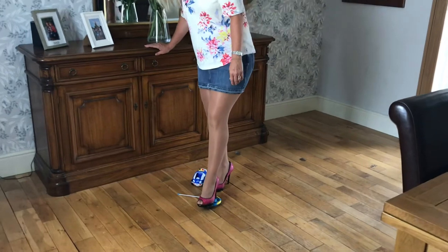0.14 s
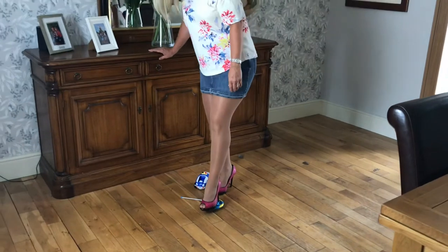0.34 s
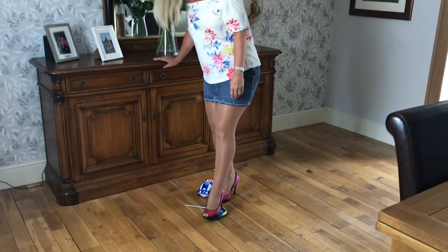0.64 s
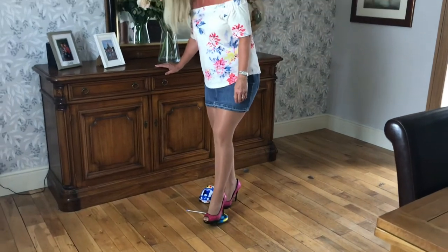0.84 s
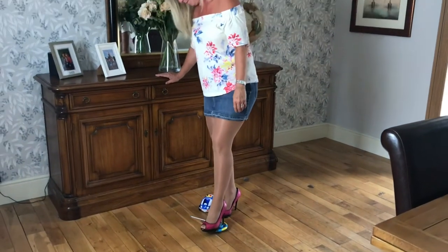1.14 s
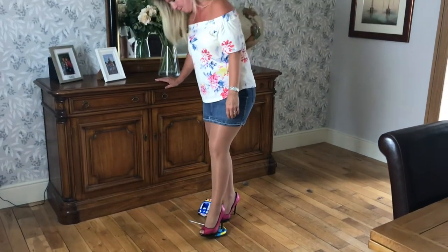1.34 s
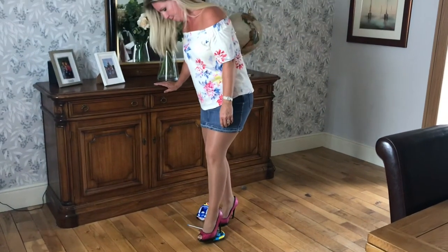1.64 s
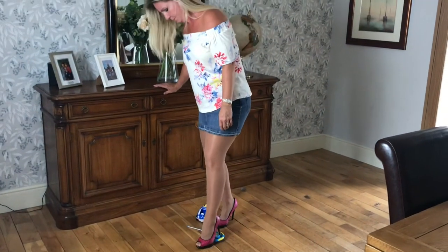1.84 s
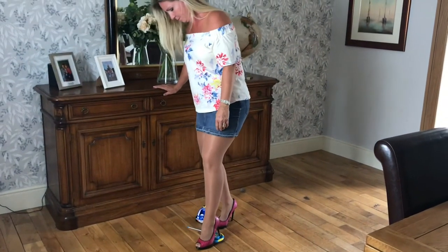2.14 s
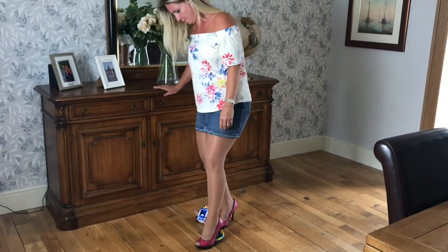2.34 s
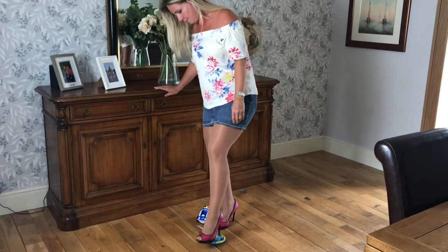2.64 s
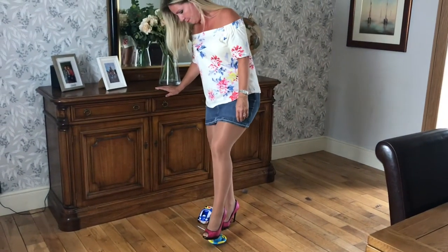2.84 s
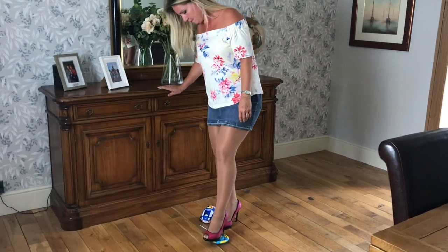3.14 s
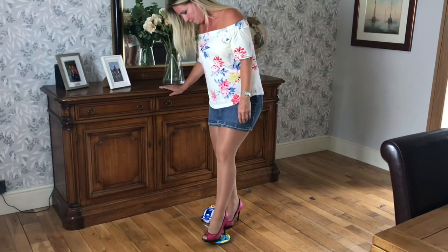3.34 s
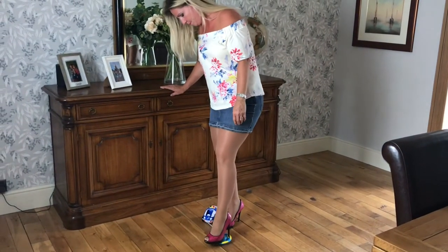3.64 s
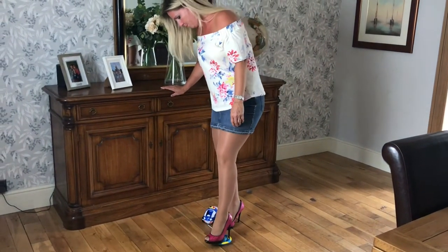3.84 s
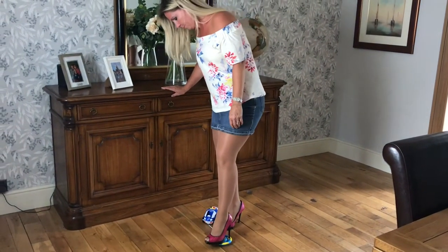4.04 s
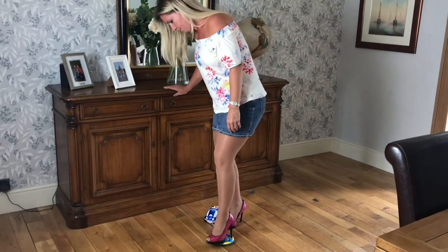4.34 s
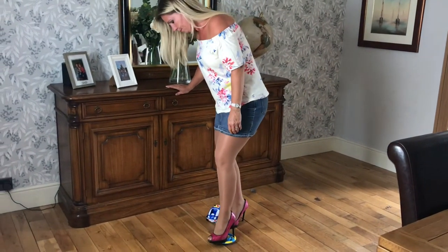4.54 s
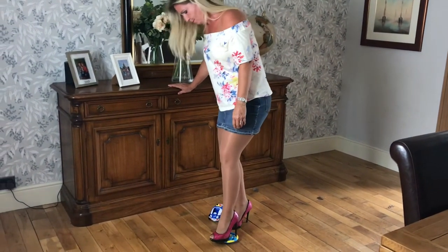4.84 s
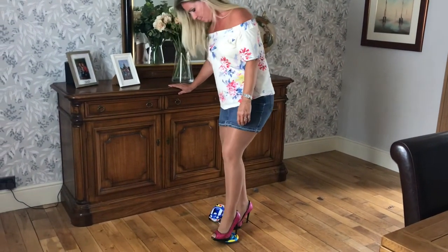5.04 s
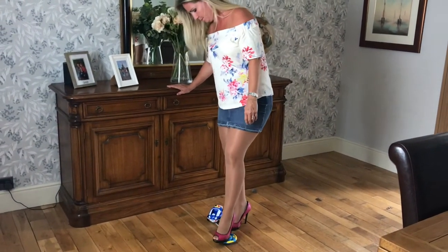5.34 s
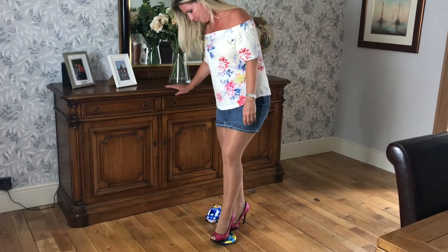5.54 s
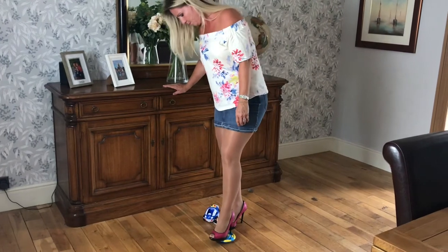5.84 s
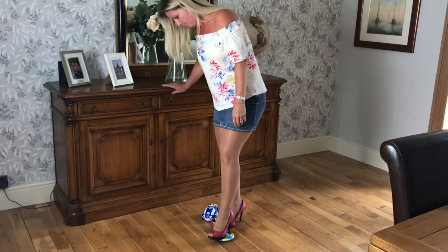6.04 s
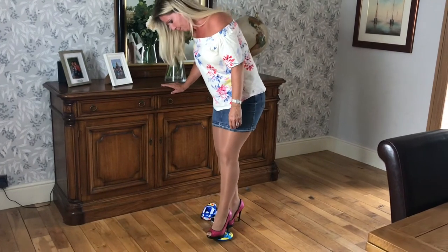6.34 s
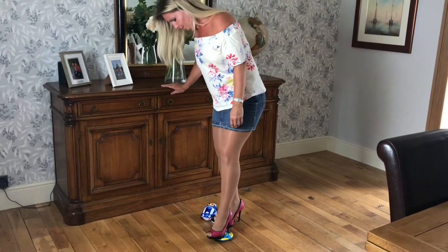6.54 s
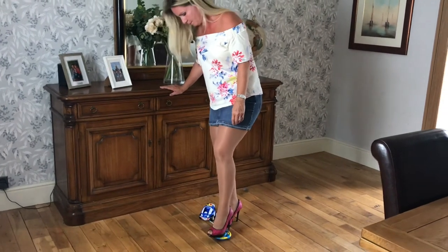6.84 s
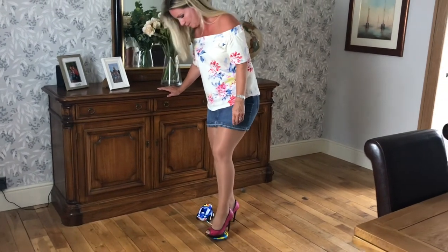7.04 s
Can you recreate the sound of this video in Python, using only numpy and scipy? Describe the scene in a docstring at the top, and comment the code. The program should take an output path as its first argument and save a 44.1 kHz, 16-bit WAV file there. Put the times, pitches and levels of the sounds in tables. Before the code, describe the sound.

A heel works on a hard, hollow plastic toy on a wooden floor in a bare, reflective room, heard in mono from a few metres. Barely audible ticks open it, then clear clacks at about 0.4, 0.55 and 0.85 s. After a softer knock at 1.3 s, the brightest, hardest cracks snap at 1.65 and 1.7 s, with a duller one at 1.8 s. From 2.2 to 2.5 s a tight flurry of loud, hollow crunching knocks tumbles together. Lighter knocks come near 3.2, 3.35 and 3.5 s, then sparse faint clicks from 4.1 to 5 s. Modest clacks follow at 5.3 and 5.8 s, a strong hollow knock at 6.47 s and a duller one at 6.74 s. Each leaves about half a second of reverberation. Soft room noise and low rumble swell at the end, with a faint low drone.

```python
"""Hard toy ground under a heel in a bare room

A heel grinds and stamps a hard plastic toy on a wooden floor, heard from a few metres. Each contact is a noise
burst through the resonances of boards, hollow, shell and cracking plastic. The room adds three echoes and a
diffuse tail, longest near 1 kHz and shortest at the top, as noise under a decaying envelope.
Below lie filtered noises: a low rumble, faint room noise and a late drone."""
import sys
import numpy as np
from scipy import signal
from scipy.fft import rfft, irfft
from scipy.io import wavfile

SR = 44100
rng = np.random.default_rng(int(sys.argv[2]) if len(sys.argv) > 2 else 0)


def materialize(psi):
    """Save the field psi as 16-bit PCM at rate SR to the path in sys.argv[1].

    A 1-D psi becomes a single channel; in a 2-D psi each row is a channel.
    """
    bounded = np.clip(np.atleast_2d(psi).T, -1, 1)
    quanta = np.round(bounded * 32767).astype(np.int16)
    wavfile.write(sys.argv[1], SR, quanta)


N = 316197

# contacts: t/s, push on floor/dB, knock on hollow/dB, crack/dB, crack treble slope/(dB/octave),
# favoured f of squashed hollow/Hz, favoured f of bent shell/Hz, hollow ring re its drive/dB, burst length/ms
CONTACTS = [(0.0353, -74.5, -53.5, -60.5, -16, 1064, 2920, -4, 1.2),
            (0.2087, -76, -51.5, -83, 12.5, 915, 1770, -16, 2.3),
            (0.3794, -34.5, -27, -30, -1, 730, 5200, -13, 0.47),
            (0.5462, -46, -34, -22.5, 3.5, 775, 2540, -3.5, 0.63),
            (0.856, -42.5, -35.5, -29.5, -10, 730, 2630, -6, 1.2),
            (1.337, -53, -47, -54.5, -17, 753, 2470, -11, 2.1),
            (1.423, -72, -67.5, -60.5, -2.5, 602, 4400, -4, 2.5),
            (1.6207, -63, -55.5, -64, -3, 640, 4050, -14.5, 2.5),
            (1.6443, -26.5, -24, -13.5, -7, 597, 5000, -4.5, 0.18),
            (1.7103, -24.5, -22.5, -15, -4, 720, 2496, -9, 0.45),
            (1.799, -38.5, -29, -26, -6.5, 663, 2820, -3, 6.8),
            (1.9992, -65, -43.5, -34.5, -11, 650, 4320, -11, 0.33),
            (2.1713, -63, -46, -48, -4, 594, 2300, -10, 1.4),
            (2.199, -28, -29.5, -41, -8, 1020, 2220, -7, 4.7),
            (2.2073, -28.5, -17.5, -21.5, -5.5, 606, 2180, -3.5, 7.2),
            (2.2204, -34, -21.5, -24.5, -5, 730, 2400, -5, 4.4),
            (2.244, -24.5, -29, -38, -2, 710, 2180, -2, 5.1),
            (2.281, -28, -28.5, -47, -6, 684, 2220, -5, 5.1),
            (2.3519, -33, -26.5, -24, -2.5, 1146, 1760, -8.5, 1.2),
            (2.468, -43, -33, -38, -9, 728, 2250, -2, 29),
            (2.609, -62, -58, -49.5, -2.5, 696, 4370, -4, 3.2),
            (2.7982, -59.5, -63, -58.5, -7.5, 770, 3490, -4.5, 2.3),
            (3.184, -50.5, -46, -57.5, -22, 613, 2710, -6, 1.7),
            (3.2, -58.5, -44, -48, -6, 704, 2370, -14, 4.8),
            (3.3501, -35, -33, -44, -8, 660, 2430, -5, 2.3), (3.381, -46, -47, -58, 1, 723, 3050, 6, 2.6),
            (3.5116, -40, -33, -30, -10, 1255, 2950, -6.5, 0.35),
            (4.0905, -53, -45, -44.5, -8.5, 766, 2010, -4.5, 1.9),
            (4.203, -61, -57, -40.5, -3, 704, 8740, 2, 1.2),
            (4.4899, -57.5, -53, -61.5, -2, 540, 3820, -8.5, 1.1),
            (4.597, -63.5, -54.5, -54, -18, 1300, 2570, -15.5, 0.6),
            (4.692, -59, -57.5, -61, -2, 964, 3770, -10.5, 6),
            (4.77, -55, -56.5, -71, -3.5, 561, 2550, -13, 3.2),
            (4.8524, -70, -64.5, -55.5, -7.5, 1250, 5230, 1, 0.45),
            (4.9024, -64, -41, -43, -8, 1106, 2610, -12, 0.82),
            (4.9665, -55, -38.5, -53.5, -4, 920, 1940, -6.5, 2),
            (5.056, -60.5, -64, -75, -24, 973, 2130, -9, 3.3),
            (5.297, -74, -38.5, -60.5, -7, 932, 2600, -5, 5),
            (5.316, -43.5, -34, -41.5, -3, 1180, 6740, 0, 1.8),
            (5.4988, -75, -43, -54, -9, 806, 3980, -4, 3.5),
            (5.6523, -50.5, -46, -63.5, -1.5, 513, 3680, -13, 0.68),
            (5.7805, -74, -44, -56.5, -2.5, 970, 2080, 2, 2.8),
            (5.8054, -41.5, -31.5, -51, -12.5, 471, 3310, -12, 1.6),
            (5.9156, -58, -52, -57.5, 1.5, 1300, 1810, -1, 0.25),
            (6.379, -59.5, -67, -75, 2, 910, 3270, -1, 2.7),
            (6.4703, -44, -20, -25, -8.5, 968, 1890, -6, 1.7),
            (6.7365, -37, -31, -48, -12.5, 505, 1750, -14.5, 1.0),
            (7.0646, -56.5, -49.5, -61.5, -5.5, 906, 2590, -5, 2.2)]

# resonances of each part: f/Hz, width/Hz, relative level/dB
THUD = [(77.4, 76, -8), (115, 120, -4), (172, 31, -0.5)]
BOARDS = [(225, 47, -5), (355, 98, 1), (456, 180, -4.5)]
HOLLOW = [(535, 130, -1.5), (630, 98, -3), (710, 120, 1.5), (934, 340, -5), (1063, 160, -2),
          (1308, 260, -3.5)]
SHELL = [(1674, 180, -5), (1935, 210, -2), (2253, 280, -2.5), (2773, 690, -2)]
CRACK = [(3450, 470, -1.5), (3680, 460, -1), (4350, 810, 0)]
SNAP = [(5460, 810, -1), (6400, 2400, 0.62), (6930, 700, -2)]
SPLINTER = [(7980, 710, -4), (9150, 1200, 0)]
FIZZ = [(10900, 1300, -1.5), (12650, 1000, -1.2), (16000, 2000, -1.5)]
PARTS = [THUD, BOARDS, HOLLOW, SHELL, CRACK, SNAP, SPLINTER, FIZZ]    # in order of rising pitch

RUMBLE_HZ, RUMBLE_WIDTH_HZ = 49, 27
DRONE_HZ, DRONE_WIDTH_HZ = 172, 63
THUD_UNDER_DB, THUD_DB_PER_DOUBLING = -17.5, 4    # longer contacts push more deep thud under the boards
SHELL_SHARE, SHELL_OVER_DB = 0.48, 1    # the shell is driven by crack (this share) and knock
SNAP_DB, SPLINTER_DB, FIZZ_DB = 0.5, -4.1, 1.5    # colour of the crack's treble about its slope
SPREAD_DB = 1.3    # standard deviation of a resonance from contact to contact
FAVOUR_DB, FAVOUR_OCTAVES = 3.5, 0.29    # resonances near a favoured pitch are driven harder
HOLLOW_RING_WIDTH, SHELL_RING_WIDTH = .06, .09    # width of a favoured pitch, as a share of it
SHELL_RING_DB = -12    # shell's favoured pitch re the drive around it
DIRECT_DB, DIRECT_CUT_HZ = 5.0, 330    # the small toy radiates little bass straight
TAIL_DB, TAIL_RISE_MS = -3.5, 6
HISS_DB, CUTOFF_HZ = -75, 16300


def from_db(db):
    """Decibels to gain."""
    return 10 ** (np.asarray(db) / 20)


def rms_one(x):
    """Scale to unit rms."""
    return x / np.sqrt(np.mean(x ** 2) + 1e-20)


def at_hz(points, hz):
    """Interpolate the second column over log frequency."""
    points_hz, values = np.array(points)[:, :2].T
    return np.interp(np.log(hz), np.log(points_hz), values)


def band(x, hz, width_hz):
    """Steep-sided resonance; unit white noise comes out near rms 1."""
    edges_hz = [hz - width_hz / 2, hz + width_hz / 2]
    sos = signal.butter(2, edges_hz, "band", fs=SR, output="sos")
    return signal.sosfilt(sos, x) * np.sqrt(SR / 2 / width_hz)


def fade(x, seconds):
    """One-pole smoothing with unit area."""
    r = np.exp(-1 / (seconds * SR))
    return signal.lfilter([1 - r], [1, -r], x + 1e-18)


def centre_hz(modes):
    """Mean pitch of a part's resonances."""
    return np.mean(np.array(modes)[:, 0])


def ambience():
    """Swelling and sinking room noise over a wavering rumble and a late drone, all filtered noise."""
    # t/s, room noise level/dB, rumble level/dB
    levels = [(0, -59, -64), (.35, -57.5, -56), (.8, -62.5, -68.5), (1.3, -60.5, -59), (2.302, -63, -60),
              (3.2, -60.5, -59), (3.9, -59.5, -58.5), (5.002, -59.5, -63.5), (5.6, -58, -60),
              (6.3, -56.5, -54), (6.7, -53.5, -58), (7.17, -53, -53)]
    # f/Hz, relative spectral level/dB
    noise_spectrum = [(53, -36), (90, -7.5), (176, -1), (278, -3), (345, 0), (510, -11), (935, 0),
                      (1440, -9), (4960, -26), (13200, -44), (16000, -23.5)]
    # t/s, drone level/dB
    drone_levels = [(4.9, -72.5), (5.8, -63.5), (7.17, -58)]
    t = np.arange(N) / SR
    s, noise_db, rumble_db = np.transpose(levels)
    drone_s, drone_db = np.transpose(drone_levels)

    hz = np.maximum(np.fft.rfftfreq(N, 1 / SR), 1)
    colour = from_db(at_hz(noise_spectrum, hz))
    noise = rms_one(irfft(rfft(rng.standard_normal(N)) * colour, N))
    rumble, drone = rng.standard_normal((2, N))
    for _ in range(2):    # twice through the resonance steepens its flanks
        rumble = band(rumble, RUMBLE_HZ, RUMBLE_WIDTH_HZ)
        drone = band(drone, DRONE_HZ, DRONE_WIDTH_HZ)

    out = from_db(np.interp(t, s, noise_db)) * noise
    out += from_db(np.interp(t, s, rumble_db)) * rms_one(rumble)
    out += from_db(np.interp(t, drone_s, drone_db)) * rms_one(drone)
    return out


def part_levels():
    """Drive in dB per contact (row) and part (column): push, knock and crack spread over the parts."""
    _, push_db, knock_db, crack_db, slope, *_, length_ms = np.transpose(CONTACTS)
    thud_db = push_db + THUD_UNDER_DB + THUD_DB_PER_DOUBLING * np.log2(np.abs(length_ms))
    shell_db = knock_db + SHELL_SHARE * (crack_db - knock_db) + SHELL_OVER_DB
    treble_db = []
    for modes, colour_db in [(SNAP, SNAP_DB), (SPLINTER, SPLINTER_DB), (FIZZ, FIZZ_DB)]:
        octaves = np.log2(centre_hz(modes) / centre_hz(CRACK))
        treble_db.append(crack_db + slope * octaves + colour_db)
    return np.transpose([thud_db, push_db, knock_db, shell_db, crack_db, *treble_db])


def burst_power(levels_db):
    """Power of the contacts: sudden start, exponential decay; long bursts spread the same energy thin."""
    power = np.zeros(N)
    for (s, *_, length_ms), level_db in zip(CONTACTS, levels_db):
        length = max(length_ms, .2) * SR / 1000    # samples
        shape = np.exp(-np.arange(round(6 * length)) / length) / length
        start = round(s * SR)
        energy = from_db(level_db) ** 2 * SR / 1000    # 0 dB: unit power for 1 ms
        power[start:start + len(shape)] += energy * shape[:N - start]
    return power


def diffuse_field(power, hz):
    """Amplitude of the room's field after a burst: builds up, then dies with the decay at this pitch."""
    # f/Hz, T60/s
    room_t60 = [(150, 0.52), (400, 0.56), (1040, 0.65), (2760, 0.62), (7280, 0.53), (15000, 0.43)]
    decay_s = at_hz(room_t60, hz) / np.log(1e6)    # power falls by a million in T60
    rise_s = TAIL_RISE_MS / 2000    # half of the rise per smoothing
    built = fade(fade(power, rise_s), rise_s)
    return np.sqrt(np.abs(fade(built, decay_s) * decay_s * 1000))


def favoured_rings():
    """As the toy deforms, hollow and shell favour other pitches at each contact; the room carries them on."""
    out, noise = np.zeros(N), rng.standard_normal(N)
    centres = [centre_hz(modes) for modes in PARTS]
    for (s, *_, hollow_hz, shell_hz, hollow_db, _), levels_db in zip(CONTACTS, part_levels()):
        start = round(s * SR)
        end = min(start + round(.7 * SR), N)
        drive_spectrum = np.transpose([centres, levels_db])
        rings = [(hollow_hz, hollow_db, HOLLOW_RING_WIDTH), (shell_hz, SHELL_RING_DB, SHELL_RING_WIDTH)]
        for hz, ring_db, width in rings:
            power = np.zeros(end - start)
            power[0] = from_db(ring_db + at_hz(drive_spectrum, hz)) ** 2 * SR / 1000
            out[start:end] += band(noise[start:end] * diffuse_field(power, hz), hz, width * hz)
    return out


def toy_in_room():
    """Every resonance takes each contact straight, and again as the diffuse field of the room."""
    # delay/ms, level/dB: off sideboard, floor and wall
    echoes = [(3.3, -2.5), (6.6, -6), (12.2, -2.5)]
    direct, tail = np.zeros(N), favoured_rings()
    grit, diffuse = rng.choice([-1., 1.], N), rng.standard_normal((2, N))
    centres = [centre_hz(modes) for modes in PARTS]
    favoured_hz = np.array(CONTACTS)[:, 5:7]
    # a part's level is spread over the width of its resonances
    widths_hz = [np.sum(np.array(modes)[:, 1]) for modes in PARTS]
    per_hz_db = part_levels() - 10 * np.log10(widths_hz)

    for k, (hz, width_hz, mode_db) in enumerate(sum(PARTS, [])):
        # the parts are coupled: a resonance between two centres is driven by both
        drive_db = np.array([at_hz(np.transpose([centres, row]), hz) for row in per_hz_db])
        octaves_off = np.log2(favoured_hz / hz)
        drive_db += FAVOUR_DB * np.exp(-(octaves_off / FAVOUR_OCTAVES) ** 2).max(axis=1)
        spread_db = SPREAD_DB * rng.standard_normal(len(CONTACTS))
        power = burst_power(drive_db + 10 * np.log10(width_hz) + mode_db + spread_db)
        direct += band(grit * np.sqrt(power), hz, width_hz) * (-1) ** k    # neighbours in opposite sign
        tail += band(diffuse[k % 2] * diffuse_field(power, hz), hz, width_hz)

    direct = signal.sosfilt(signal.butter(1, DIRECT_CUT_HZ, "high", fs=SR, output="sos"), direct)
    out = direct.copy()
    for delay_ms, echo_db in echoes:
        lag = round(delay_ms * SR / 1000)
        out[lag:] += from_db(echo_db) * direct[:-lag]
    return from_db(DIRECT_DB) * out + from_db(TAIL_DB) * tail


def scene():
    """Toy and room over the ambience, one channel."""
    return (ambience() + toy_in_room())[None]


def record(dry):
    """The microphone hisses faintly, peaks are rounded, the top is cut."""
    hiss = from_db(HISS_DB) * rng.standard_normal(dry.shape)
    rounded = .95 * np.tanh((dry + hiss) / .95)
    steep = signal.cheby2(16, 60, CUTOFF_HZ, fs=SR, output="sos")
    return signal.sosfilt(steep, rounded)


dry = scene()
out = record(dry)
materialize(out)
```